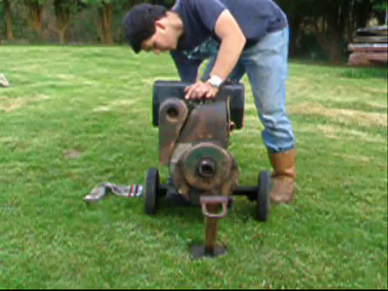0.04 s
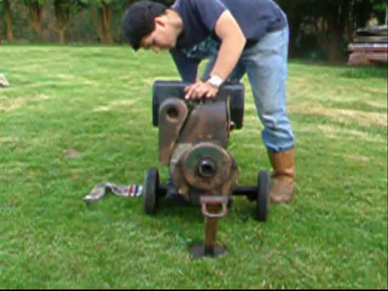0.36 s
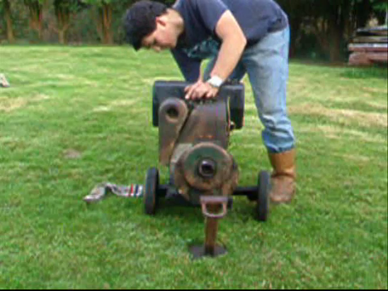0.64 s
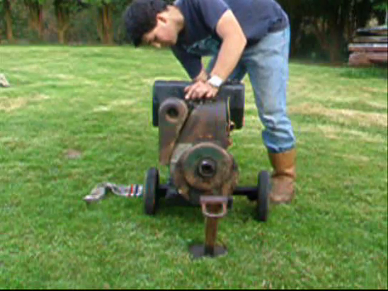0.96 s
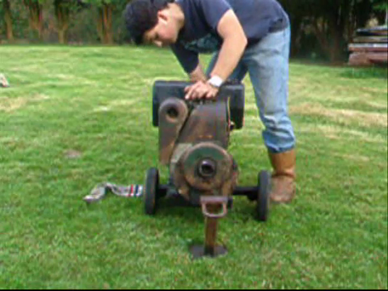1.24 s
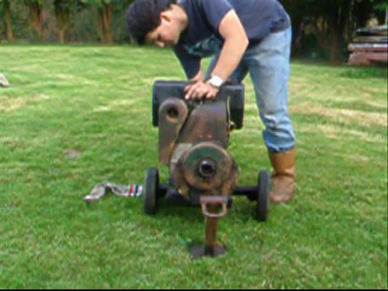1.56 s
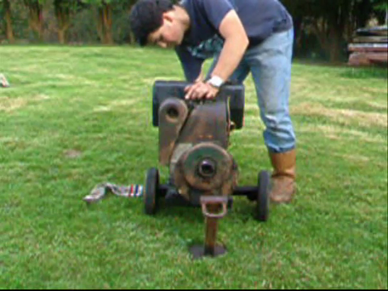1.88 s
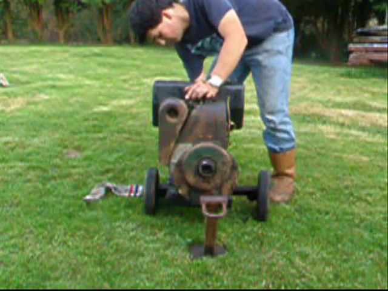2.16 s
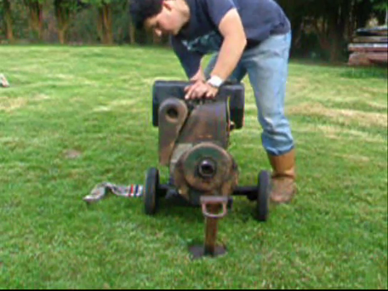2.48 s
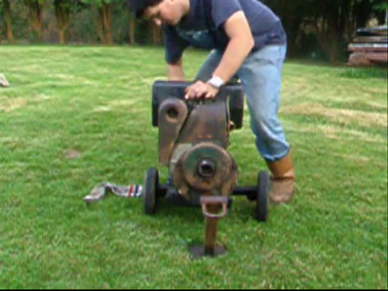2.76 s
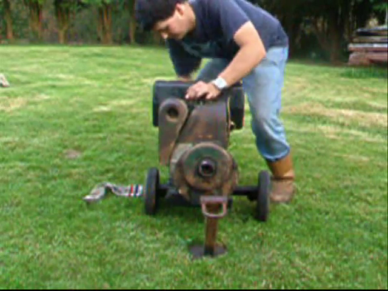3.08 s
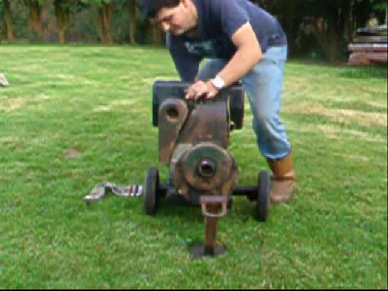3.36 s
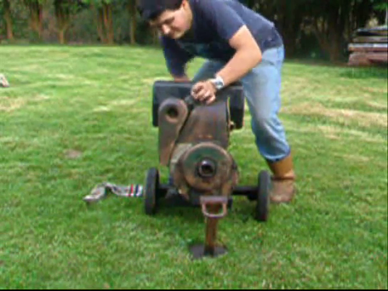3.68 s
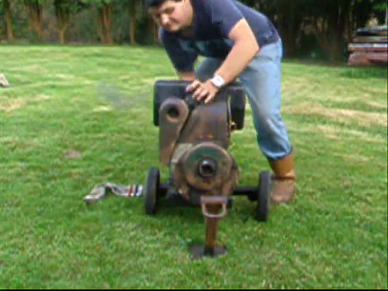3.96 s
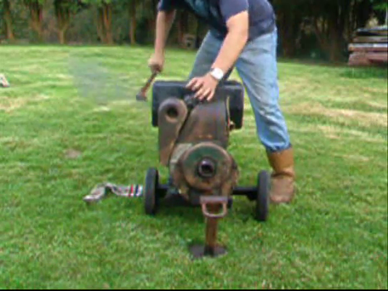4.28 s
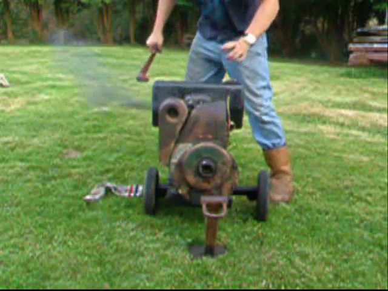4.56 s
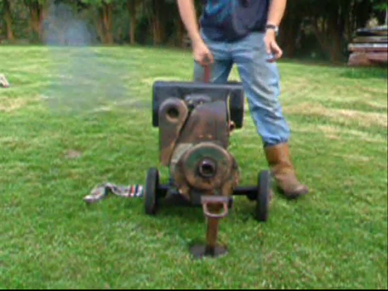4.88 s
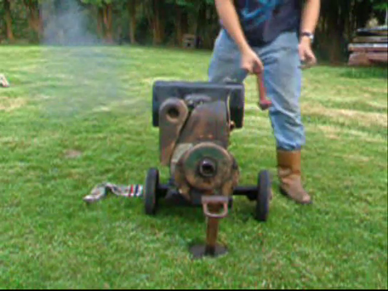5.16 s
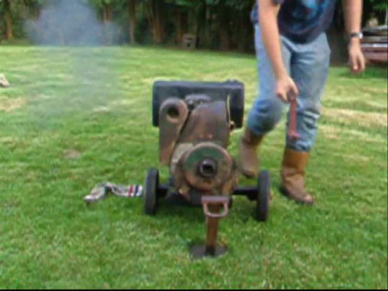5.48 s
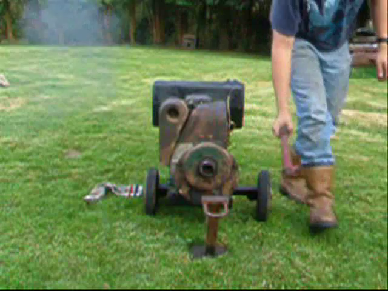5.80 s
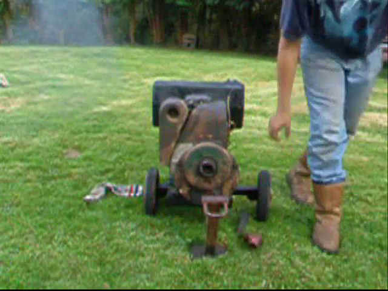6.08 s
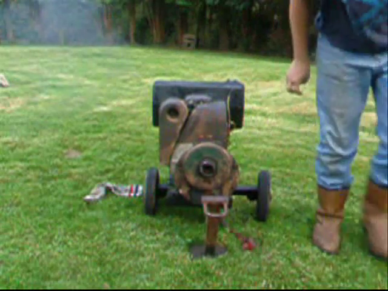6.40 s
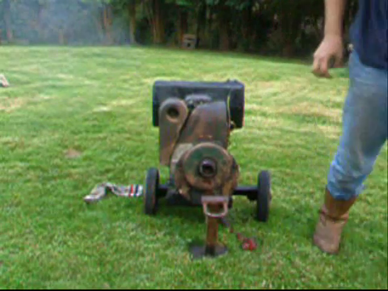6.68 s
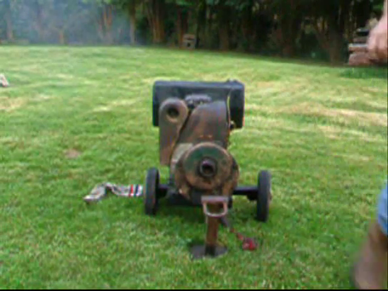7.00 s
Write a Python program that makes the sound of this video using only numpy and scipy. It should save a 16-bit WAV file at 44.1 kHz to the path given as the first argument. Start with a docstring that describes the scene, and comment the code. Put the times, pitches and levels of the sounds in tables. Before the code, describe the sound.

Faint outdoor air lies under everything. A steel crank handle knocks softly against a small single-cylinder engine at about 0.7 seconds, then clunks and clinks near 2 and 2.3 seconds. From 2.8 seconds cranking begins, with more clunks, a very brief groan and rattling gears. Air hisses out in short puffs, the hardest ending in a pop at 3.3 seconds, with another at 3.6. A lever drops with a bright clink at 3.8 seconds. The engine first fires at 3.9 seconds, giving heavy knocking thuds about four times a second, mixed with hollow chuffs, exhaust spits and valve clacks. The beats draw closer and grow louder, and from 5 seconds the firing turns lighter and quicker. By 6 seconds it is chugging and clattering at around ten beats a second, running steadily until the end at about 7 seconds. The engine is close, on open grass, with little echo.

```python
"""A small old single-cylinder diesel is hand-cranked on a lawn, catches and picks up speed.
The steel handle clunks, gears rattle, and air hisses past the lifted valve until the decompressor
lever drops. Then each cycle brings a firing knock, an exhaust crack, two valve clacks and a hollow
chuff that rises as the piston shrinks the cylinder. Quiet outdoor air lies underneath."""
import sys
import numpy as np
from scipy import signal
from scipy.fft import rfft, irfft
from scipy.io import wavfile

SR = 44100
rng = np.random.default_rng(int(sys.argv[2]) if len(sys.argv) > 2 else 0)


def dump_mix(stems):
    """Bounce the given channels to the path in sys.argv[1] as a 16-bit WAV at rate SR."""
    frames = np.atleast_2d(stems).T  # one column per channel
    limited = np.clip(frames, -1, 1)  # hard clip at full scale
    pcm = np.round(limited * 32767).astype(np.int16)
    wavfile.write(sys.argv[1], SR, pcm)


N = 319284
TIME_S = np.arange(N) / SR


def gain_of(db):
    return 10 ** (np.asarray(db) / 20)


def unit_rms(x):
    return x / np.sqrt(np.mean(x ** 2) + 1e-20)


def add(mix, start_s, sound):
    part = mix[max(round(start_s * SR), 0):][:len(sound)]
    part += sound[:len(part)]


def butter(x, order, hz, kind="low"):
    return signal.sosfilt(signal.butter(order, hz, kind, fs=SR, output="sos"), x)


def wander(length, hz):
    """Smooth random drift, unit RMS."""
    return unit_rms(butter(rng.standard_normal(length + SR // 4), 2, hz)[-length:])


def rasp(length, grit_db=2, grit_hz=370):
    """Noise with a gritty, uneven level."""
    return unit_rms(rng.standard_normal(length) * gain_of(grit_db * wander(length, grit_hz)))


def colour(x, spectrum, modes=(), size=8192):
    """Minimum-phase filter of unit energy: broad spectrum plus ringing modes."""
    hz = np.fft.rfftfreq(size, 1 / SR)
    knot_hz, knot_db = np.transpose(spectrum)
    broad = gain_of(np.interp(np.log(hz + 1), np.log(knot_hz + 1), knot_db))
    peaks = sum(gain_of(lift) ** 2 / (1 + (2 * (hz - at) / width) ** 2) for at, width, lift in modes)
    cepstrum = irfft(np.log(broad * np.sqrt(1 + peaks)))[:size // 2]
    impulse = irfft(np.exp(rfft(2 * cepstrum, size) - cepstrum[0]))[:size // 2]
    return signal.oaconvolve(x, impulse / np.linalg.norm(impulse))[:N]


def bursts(times_s, levels_db, rise_s, fall_s, hold_s=0, alike=0):
    """Noise puffs that swell up to their times, hold and decay; power share `alike` repeats exactly."""
    power, repeated = np.zeros((2, N))
    t = np.arange(-SR // 8, SR // 4) / SR
    grain = rasp(len(t))
    for s, db, up, down in np.broadcast(times_s, levels_db, rise_s, fall_s):
        shape = gain_of(db) * np.exp(np.minimum(t, 0) / up - np.maximum(t - hold_s, 0) / down)
        add(power, s + t[0], shape ** 2)
        add(repeated, s + t[0], shape * grain * np.linalg.norm(shape) / np.linalg.norm(shape * grain))
    return np.sqrt((1 - alike) * power) * rasp(N) + np.sqrt(alike) * repeated


def pushes(times_s, levels_db, hz, decay_s):
    """Short shoves of air, each a damped sine."""
    t, out = np.arange(SR // 10) / SR, np.zeros(N)
    for s, db in np.broadcast(times_s, levels_db):
        add(out, s, gain_of(db) * np.sin(2 * np.pi * hz * t) * np.exp(-t / decay_s))
    return out


# Outdoor air: f/Hz, level/dB
AIR_SPECTRUM = [(18, -59), (26, -15), (64, 1.5), (174, -5.5), (210, -4), (449, -5.5), (720, -6),
                (961, -8.5), (2410, -14), (13600, -23.5), (16000, -34)]
def air(level_db=-46, swell_db=1):
    """Quiet outdoor wash with a faint hiss."""
    wash = colour(rng.standard_normal(N), AIR_SPECTRUM)
    return wash * gain_of(level_db + swell_db * wander(N, 9.5))


# Handle and lever knocks: t/s, clunk/dB, ring/dB, tick/dB
HANDLE_KNOCKS = [(0.671, -54, -44.5, -55), (0.706, -44, -48, -48), (1.973, -38, -36.5, -34),
                 (2.25, -42, -29, -42), (2.779, -34.5, -45, -31.5), (2.924, -37, -45, -36.5),
                 (3.778, -59, -37.5, -25), (3.916, -34.5, -27, -36), (4.049, -27.5, -23.5, -30.5)]
# Steel ring and tick: f/Hz, level/dB
RING_SPECTRUM = [(700, -58), (1600, -5.5), (2300, -1.5), (3000, -5.5), (8000, -31)]
TICK_SPECTRUM = [(1000, -10), (3000, 6), (5500, 4.5), (8000, -5), (11000, -0.5), (15000, -9)]
# Case and handle resonances: f/Hz, width/Hz, lift/dB
CASE_MODES = [(367, 20, 4.3), (531, 51, 7), (708, 16, 9.6), (834, 69, 10.4)]
HANDLE_MODES = [(1820, 140, 7.7), (2140, 40, 5.6), (2180, 31, 13), (2476, 39, 14.3)]
def handle():
    """Steel handle and lever clunk, ring and tick against the engine."""
    s, clunk_db, ring_db, tick_db = np.transpose(HANDLE_KNOCKS)
    clunk = bursts(s + .0013, clunk_db + 4.5, rise_s=.0013, fall_s=.021)
    ring = bursts(s + .0026, ring_db + 3.5, rise_s=.0011, fall_s=.0098)
    tick = bursts(s + .0028, tick_db + 4, rise_s=.00066, fall_s=.0056)
    clunk = colour(clunk, [(100, -6), (400, 4), (950, 3), (1400, -5), (4000, -27.5)], CASE_MODES)
    return clunk + colour(ring, RING_SPECTRUM, HANDLE_MODES) + colour(tick, TICK_SPECTRUM)


# Steel clinks: t/s, f/Hz, overtone/Hz, level/dB, t60/s
STEEL_CLINKS = [(2.251, 2180, 13800, -27, .022), (3.217, 4780, 11100, -15, 0.023),
                (3.781, 5400, 10580, -19, 0.061)]
def clinks(overtone_db=-6):
    """The handle, a seating valve and the dropped decompressor lever each clink with two partials."""
    t, out = np.arange(SR // 5) / SR, np.zeros(N)
    for s, hz, overtone_hz, db, t60_s in STEEL_CLINKS:
        ring = np.sin(2 * np.pi * hz * t) + gain_of(overtone_db) * np.sin(2 * np.pi * overtone_hz * t)
        add(out, s, ring * gain_of(db - 60 * t / t60_s))
    return out


def run_up(start_s=4.977, governed_s=.09109, excess_s=.05205, excess_kept=.72, creep_s=.000146):
    """Exhaust opening times as the cycle closes in on a governed period that creeps shorter."""
    cycle = np.arange(23)
    lengths_s = governed_s + excess_s * excess_kept ** cycle - creep_s * cycle
    return start_s + np.append(0, np.cumsum(lengths_s))


# Running engine: t/s, level/dB, exhaust crack/dB (eases when the governor cuts fuel)
RUNNING_LEVELS = [(4.98, -7.5, -16), (5.4, -6.5, -13.5), (5.68, -7.5, -21), (6.18, -3, -18),
                  (6.65, -2, -21), (7.22, 1, -19)]
SCATTER_DB = .24
def running_db(times_s, full_db, slope):
    """One part's level: follows the engine by `slope` dB per dB, uneven from cycle to cycle."""
    at_s, level_db, _ = np.transpose(RUNNING_LEVELS)
    scatter_db = SCATTER_DB * rng.standard_normal(len(times_s))
    return full_db + slope * np.interp(times_s, at_s, level_db) + scatter_db


# Scrape and rattle while cranking: t/s, level/dB
CRANKING_RATTLE = [(2.75, -47), (2.9, -36.5), (3.0, -41), (3.2, -29), (3.35, -42.5), (3.85, -43.5),
                   (4.02, -31), (4.33, -38), (4.6, -34.5)]
# Block resonances: f/Hz, width/Hz, lift/dB
BLOCK_MODES = [(838, 34, 3.2), (1462, 61, 7.2), (1820, 114, 2.9), (2130, 85, 6.6), (2296, 195, 7.2),
               (2585, 28, 7.8), (3597, 40, 4.3), (4670, 70, 7), (4870, 60, 4.9), (5120, 53, 2.2),
               (11200, 220, 4.9), (13900, 190, 5.3)]
def gears(trim_db=-3):
    """Teeth and loose parts rattle in the block."""
    rattle = rasp(N, grit_db=3, grit_hz=236)
    running = np.column_stack([run_up(), running_db(run_up(), full_db=-28, slope=1.6)])
    at_s, level_db = np.vstack([CRANKING_RATTLE, running]).T
    rattle *= gain_of(np.interp(TIME_S, at_s, level_db, left=-100) + trim_db)
    spectrum = [(80, -11.5), (300, -2.5), (750, 5), (1100, -3.5), (2100, -2.5), (3000, -8.5),
                (5000, -13.5), (9000, -22), (12500, -17), (14500, -14.5)]
    return colour(rattle, spectrum, BLOCK_MODES)


# Puffs past the lifted valve: t/s, level/dB, rise/s, fall/s, port ring/dB
LEAK_PUFFS = [(2.886, -23, 0.017, 0.02, -42), (3.269, -13, 0.0044, 0.0071, -41),
              (3.281, -9.5, 0.0029, 0.005, -31), (3.285, -9, 0.0031, 0.0034, -28),
              (3.275, -21, 0.013, 0.0068, -42), (3.584, -17.5, 0.013, 0.008, -27)]
# Jet: f/Hz, level/dB
JET_SPECTRUM = [(150, -25), (700, -14.5), (2300, -11), (2800, -12.5), (4200, -8), (6800, -8.5),
                (8300, -9.5), (9800, -9), (12200, -16), (14500, -12), (16000, -33)]
# Pipe and port resonances: f/Hz, width/Hz, lift/dB
PIPE_MODES = [(1550, 56, -1), (3035, 46, 4), (4880, 150, 5), (5490, 270, 4), (6364, 190, 10.5),
              (7120, 200, 2.5), (9610, 460, 5), (10840, 190, 0)]
PORT_MODES = [(1393, 45, 21), (2300, 59, 18.5)]
def leaks(whistle_db=7, narrowing=.63):
    """Compression escapes as a jet: the pipe whistles, the port rings, the hardest puff ends in a pop."""
    s, jet_db, rise_s, fall_s, port_db = np.transpose(LEAK_PUFFS)
    whistles = [(hz, width * narrowing, lift + whistle_db) for hz, width, lift in PIPE_MODES]
    jet = colour(bursts(s, jet_db, rise_s, fall_s), JET_SPECTRUM, whistles)
    port = bursts(s, port_db, rise_s, fall_s)
    port = colour(port, [(500, -21), (1400, 0), (2300, 1), (5000, -15)], PORT_MODES)
    pop = pushes(3.2865, -8, hz=131, decay_s=.0015)
    return jet + port - pop


def groan(start_s=2.92, length_s=.059, hz=684, level_db=-30):
    """The dry crank groans once as it starts to turn."""
    swell = signal.windows.hann(round(length_s * SR))
    pitch_hz = hz * (1 + .011 * wander(len(swell), 120))
    out = np.zeros(N)
    add(out, start_s, gain_of(level_db) * swell * np.sin(2 * np.pi * np.cumsum(pitch_hz) / SR))
    return out


# Laboured first turns, from exhaust opening: t/s, crack/dB, chuff/dB, top clack/dB, inlet seating/dB
SLOW_CYCLES = [(3.044, -55, -20, -33, -21.5), (3.384, -43, -38.5, -37.5, -25),
               (3.675, -45, -38.5, -35, -27), (3.956, -34, -30.5, -30, -26.5),
               (4.199, -22.5, -26.5, -32.5, -22), (4.425, -20.5, -23.5, -26.5, -20),
               (4.632, -17.5, -23, -26.5, -20), (4.815, -14.5, -23, -27.5, -24.5)]
def cycles():
    """All four-stroke cycles, columns as above: slow turns, then the run-up."""
    s = run_up()
    at_s, _, crack_db = np.transpose(RUNNING_LEVELS)
    crack_db = np.interp(s, at_s, crack_db) + SCATTER_DB * rng.standard_normal(len(s))
    chuff_db = running_db(s, full_db=-19, slope=.73)
    top_db = running_db(s, full_db=-19.5, slope=1.32)
    seat_db = running_db(s, full_db=-18.8, slope=1.14)
    return np.vstack([SLOW_CYCLES, np.column_stack([s, crack_db, chuff_db, top_db, seat_db])])


def periods_s():
    """Length of each cycle."""
    gaps_s = np.diff(np.append(np.transpose(SLOW_CYCLES)[0], run_up()))
    return np.append(gaps_s, gaps_s[-1])


# Gas column over the exhaust stroke: phase/cycle, f/Hz, slow level/dB, fast level/dB
GAS_COLUMN = [(0, 143.5, 2.5, -13), (.05, 185.4, 0, 3.5), (.1, 215, 0.5, -3.5), (0.149, 261.7, 0.5, 1),
              (.21, 356, -2.5, -4.5), (.27, 439.4, 5, -0.5), (0.331, 512, -6, 8.5), (.41, 504, -16, -12.5),
              (.6, 477, -23.5, -8), (.9, 478, -51, -2)]
# Stroke drift: t/s, length/ratio, tilt along the stroke/dB, pitch/ratio (cold air rings lower)
STROKE_DRIFT = [(3.04, 1.04, -33, 0.87), (3.68, 1.15, -30, .86), (4.2, 1.02, 18, 0.96), (5.3, 0.88, 2, 1),
                (6.2, 1.035, -7, 0.99), (7.2, 1.01, 2.5, 0.96)]
# Silencer resonances: f/Hz, width/Hz, lift/dB
SILENCER_MODES = [(148.5, 41, 7.5), (212, 7.1, 3.7), (273.8, 12, 8.1), (324, 8, 6), (495.5, 27, 6)]
def chuffs(trim_db=-3, lead_s=.00284, slow_s=.13, fast_s=.082, waver=.03, flutter_db=1.1, breath=.26):
    """Cylinder and open port ring like a bottle, climbing as the piston rises; the silencer joins in."""
    out = np.zeros(N)
    at_phase, note_hz, slow_db, fast_db = np.transpose(GAS_COLUMN)
    at_s, *drifts = np.transpose(STROKE_DRIFT)
    for (s, _, chuff_db, _, _), period_s in zip(cycles(), periods_s()):
        stretch, tilt_db, warmth = (np.interp(s, at_s, drift) for drift in drifts)
        phase = np.arange(0, period_s, 1 / SR) / (period_s * stretch)
        n = len(phase)
        speed = np.clip((1 / period_s - 1 / slow_s) / (1 / fast_s - 1 / slow_s), 0, 1)
        hz = warmth * np.interp(phase, at_phase, note_hz) * (1 + waver * wander(n, 170))
        stroke_db = np.interp(phase, at_phase, slow_db + speed * (fast_db - slow_db)) + tilt_db * phase
        angle = 2 * np.pi * np.cumsum(hz) / SR
        gas = np.sin(angle) + breath * wander(n, 300) * np.cos(angle)
        gas *= gain_of(chuff_db + trim_db + stroke_db + flutter_db * wander(n, 113))
        add(out, s - lead_s, gas * signal.windows.tukey(n, .02))
    return colour(out, [(20, -8), (100, -2), (16000, 3)], SILENCER_MODES)


def low_echo(chuff, delay_s=.0153, echo_db=-5.5, corner_hz=300):
    """A close echo of each chuff's low part beats against the rising note."""
    lows = butter(chuff, 1, corner_hz)
    return chuff + gain_of(echo_db) * np.interp(TIME_S - delay_s, TIME_S, lows)


# Exhaust crack: f/Hz, level/dB
CRACK_SPECTRUM = [(150, -23), (480, 4.5), (1060, -8.5), (1650, 6.5), (2800, -9.5), (5800, -7.5), (7800, -7),
                  (10500, -9), (12700, -23), (14300, -17), (16000, -35)]
def exhaust():
    """The valve cracks open on hot gas: a sharp spit through the pipe."""
    s, crack_db, _, _, _ = cycles().T
    spit = bursts(s - .0018, crack_db - 1, rise_s=.00077, fall_s=.00097, hold_s=.0039)
    return colour(spit, CRACK_SPECTRUM, PIPE_MODES)


# Piston tipping in its bore at low speed: t/s, level/dB
PISTON_SLAPS = [(3.152, -17), (3.169, -31), (3.219, -31), (3.471, -27.5), (3.759, -32), (4.028, -30),
                (4.264, -29.5), (4.687, -25.5)]
# Valve clack and piston slap: f/Hz, level/dB
CLACK_SPECTRUM = [(350, -30), (600, 0.5), (1180, -13.5), (1390, -1), (2370, -3.5), (3250, -4.5), (3580, -4),
                  (4330, -8.5), (4770, -3), (6020, -8.5), (14100, -15), (16000, -31)]
SLAP_SPECTRUM = [(80, -31), (180, -11), (350, -15), (510, 0), (800, -9), (1100, -22), (3000, -81)]
def valves_and_piston(thump_db=-7, alike=.55):
    """Rockers clack at top of stroke and at inlet seating; top clacks and piston slaps shake the case."""
    s, _, _, top_db, seat_db = cycles().T
    top_s, seat_s = s + .3035 * periods_s(), s + .495 * periods_s()
    top = bursts(top_s, top_db - 3.5, rise_s=.0063, fall_s=.0045, hold_s=.0045, alike=alike)
    seat = bursts(seat_s, seat_db - 4.5, rise_s=.0013, fall_s=.0066, hold_s=.0049, alike=alike)
    slap = bursts(*np.transpose(PISTON_SLAPS), rise_s=.002, fall_s=.0048, hold_s=.0093)
    clacks = colour(top + seat, CLACK_SPECTRUM, BLOCK_MODES)
    return clacks + colour(slap + gain_of(thump_db) * top, SLAP_SPECTRUM, CASE_MODES)


# Heavily fuelled first ignitions: t/s, knock/dB, thud/dB
HEAVY_IGNITIONS = [(3.891, -21.5, -21.5), (4.14, -19.5, -20.5), (4.372, -19.5, -19), (4.585, -17.5, -18),
                   (4.777, -17, -21), (4.942, -14, -20.5), (5.088, -19.5, -22.5)]
def ignitions(cycle_share=.764, light_thud_db=-45):
    """All ignitions, columns as above: the heavy ones, then a light one per cycle."""
    opens_s = run_up()
    s = opens_s[:-1] + cycle_share * np.diff(opens_s)
    s = s[opens_s[:-1] > HEAVY_IGNITIONS[-1][0]]
    knock_db = running_db(s, full_db=-18.5, slope=.61)
    return np.vstack([HEAVY_IGNITIONS, np.column_stack([s, knock_db, np.full(len(s), light_thud_db)])])


# Firing knock: f/Hz, level/dB
KNOCK_SPECTRUM = [(300, -35), (750, -4.5), (1130, -17.5), (1800, -2), (2900, -19), (3700, -9.5),
                  (8500, -22), (14300, -20.5), (16000, -55)]
# Crankcase and tank modes: f/Hz, level/dB, decay/s
THUD_MODES = [(174, -9, 0.0044), (338, -6.5, 0.0075), (635, 3.5, 0.0023), (806, 0.5, 0.005),
              (1400, -11.5, 0.0095)]
def combustion(shake_db=-10, alike=.55):
    """Ignitions knock the block; heavy ones thud through the crankcase and leave loose parts shaking."""
    s, knock_db, thud_db = ignitions().T
    knock = bursts(s + .00048, knock_db - 3, rise_s=.00052, fall_s=.0044, hold_s=.0049, alike=alike)
    # neighbouring modes oppose each other, so the thud takes a moment to build
    thud = sum((-1) ** k * pushes(s - .001, thud_db + db + 6, hz, decay_s)
               for k, (hz, db, decay_s) in enumerate(THUD_MODES))
    shake = bursts(s + .0043, thud_db + shake_db, rise_s=.0011, fall_s=.045)
    spectrum = [(200, -5), (700, 12.5), (1100, 0), (1500, -6), (2400, 2.5), (3200, -5.5), (12000, -12)]
    return colour(knock, KNOCK_SPECTRUM, BLOCK_MODES) + thud + colour(shake, spectrum, BLOCK_MODES)


def slapback(x, delay_s=.014, echo_db=-23):
    """One faint early reflection doubles the sharpest cracks."""
    return x + gain_of(echo_db) * np.pad(x, (round(delay_s * SR), 0))[:N]


def garden(x, near_db=-14, far_db=-26, near_t60_s=.09, far_t60_s=.42):
    """Quick scatter off the machine, which bass bends around, and a faint dull return from the trees."""
    t = np.arange(SR // 2) / SR
    near, far = rng.standard_normal((2, len(t))) * (t > .004)
    near = butter(near * gain_of(-60 * t / near_t60_s), 2, 600, "high")
    far = butter(far * gain_of(-60 * t / far_t60_s), 1, 3000)
    tail = gain_of(near_db) * near / np.linalg.norm(near) + gain_of(far_db) * far / np.linalg.norm(far)
    return x + signal.oaconvolve(x, tail)[:N]


def scene():
    """The engine stands close by on open grass."""
    gas = low_echo(chuffs()) + exhaust() + leaks()
    engine = gas + combustion() + valves_and_piston() + gears()
    engine = butter(engine, 2, 50, "high")  # deep bass below 50 Hz rolls away
    machine = slapback(engine) + handle() + clinks() + groan()
    return (garden(machine) + air())[None]


def record(dry, edge_hz=15600):
    """Clip the highest peaks, then limit the band."""
    lowpass = signal.firwin(255, edge_hz, window=("kaiser", 8), fs=SR)
    return signal.oaconvolve(np.clip(dry, -1, 1), lowpass[None], "same")


dry = scene()
out = record(dry)
dump_mix(out)
```